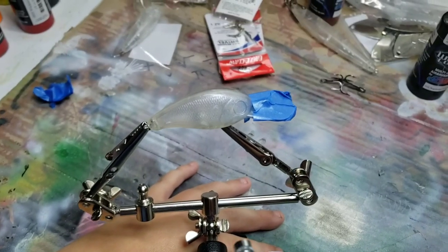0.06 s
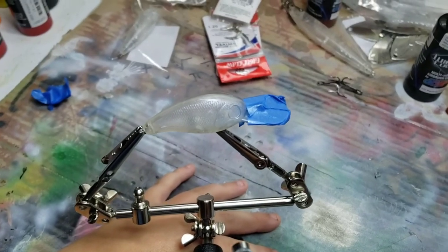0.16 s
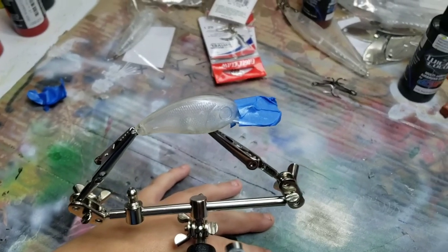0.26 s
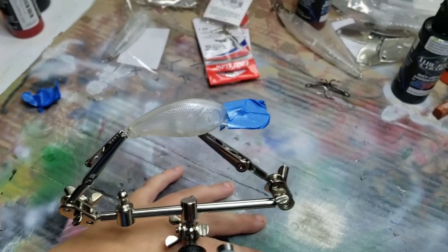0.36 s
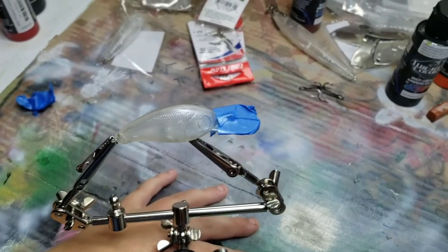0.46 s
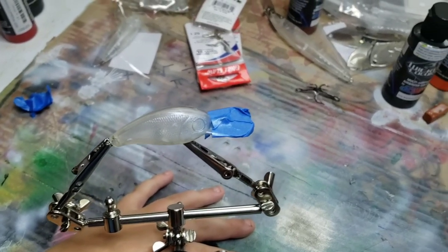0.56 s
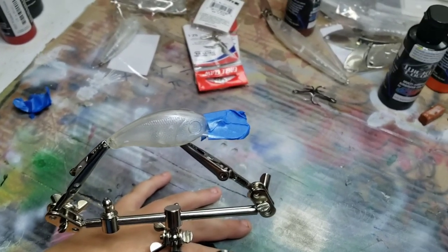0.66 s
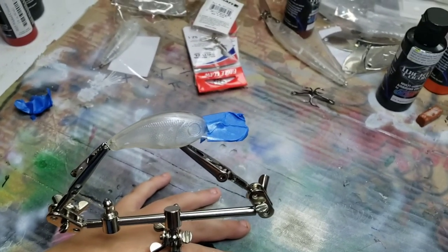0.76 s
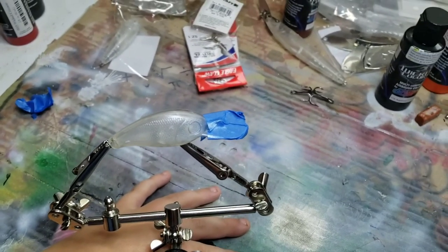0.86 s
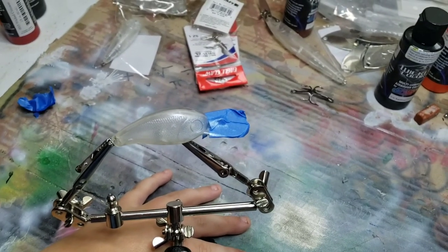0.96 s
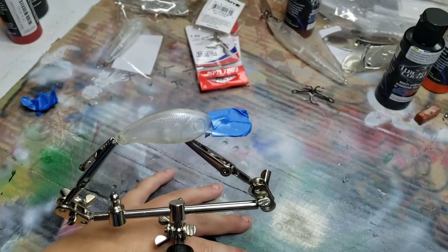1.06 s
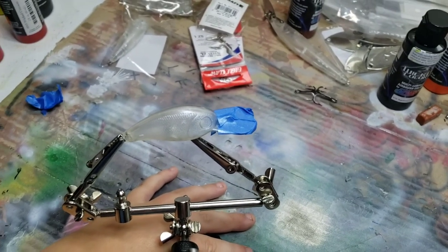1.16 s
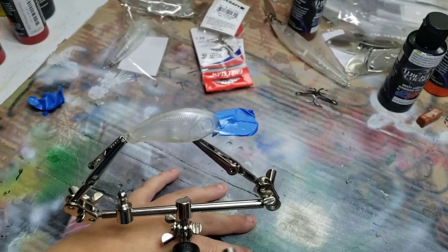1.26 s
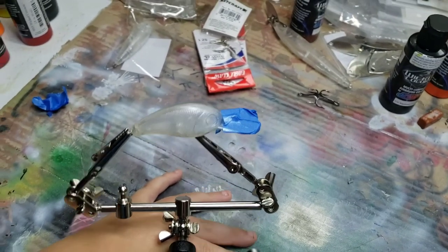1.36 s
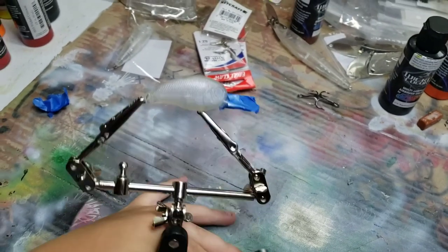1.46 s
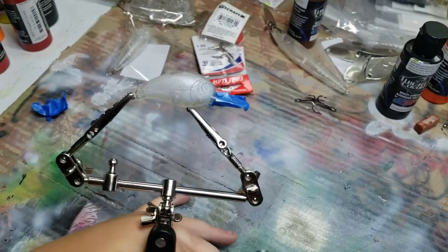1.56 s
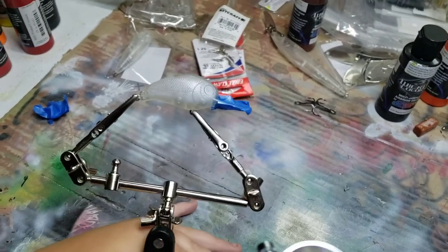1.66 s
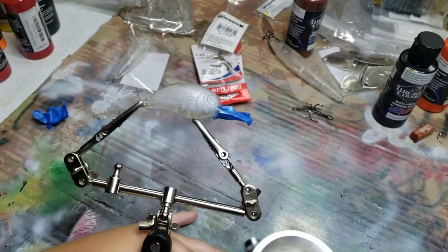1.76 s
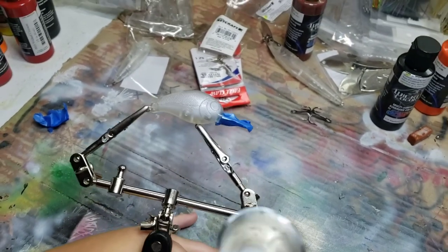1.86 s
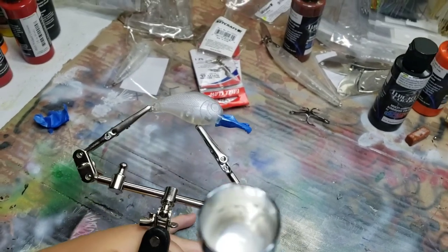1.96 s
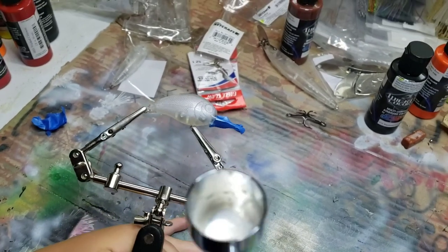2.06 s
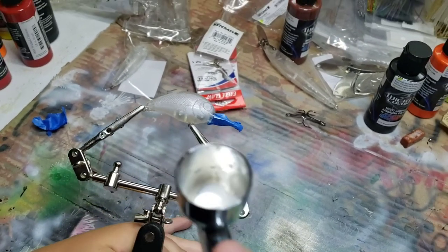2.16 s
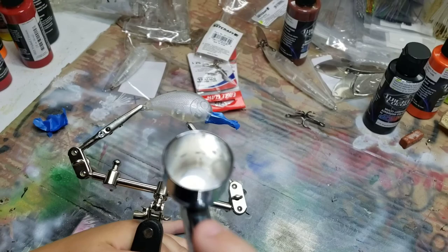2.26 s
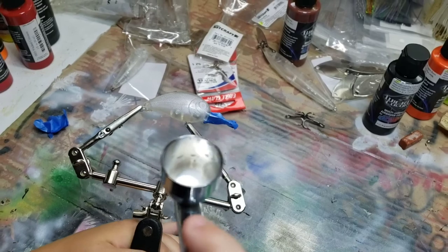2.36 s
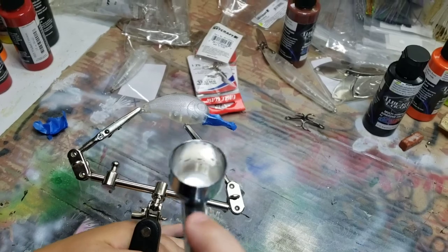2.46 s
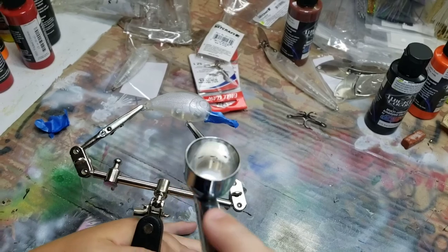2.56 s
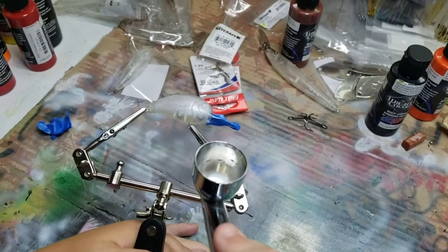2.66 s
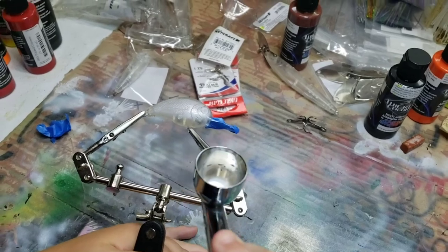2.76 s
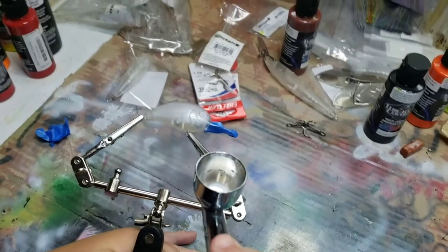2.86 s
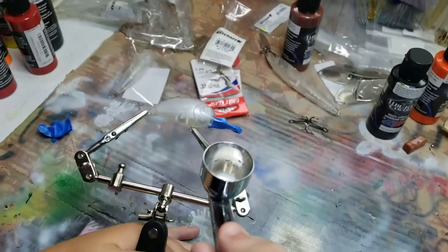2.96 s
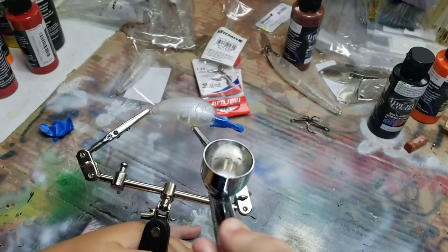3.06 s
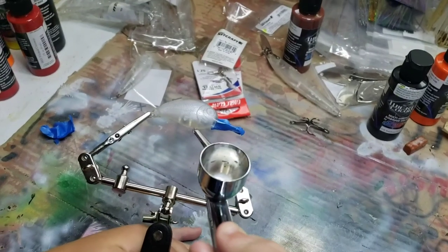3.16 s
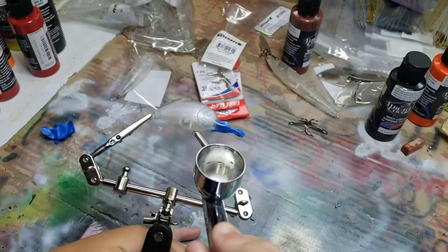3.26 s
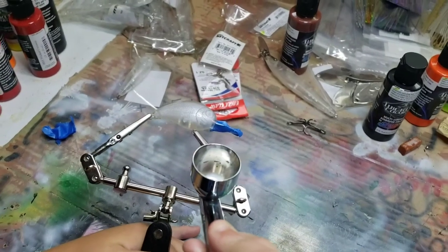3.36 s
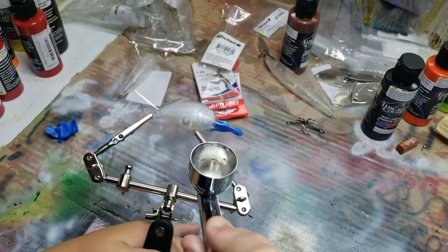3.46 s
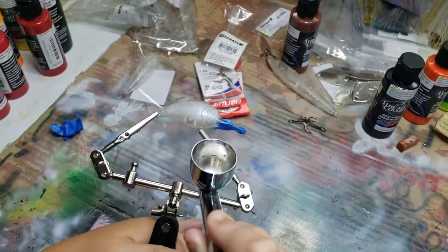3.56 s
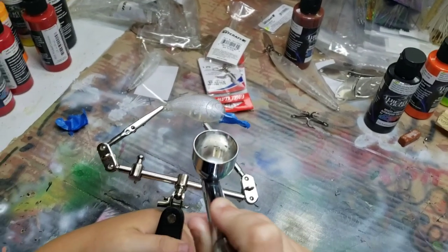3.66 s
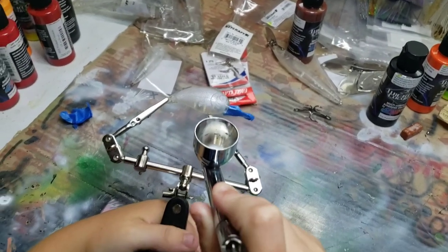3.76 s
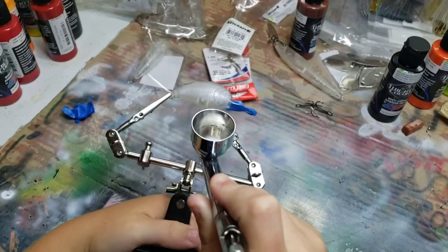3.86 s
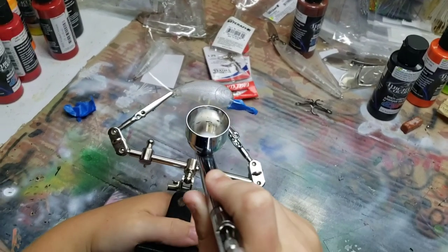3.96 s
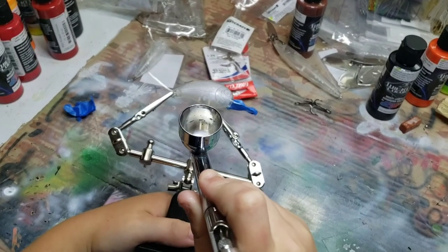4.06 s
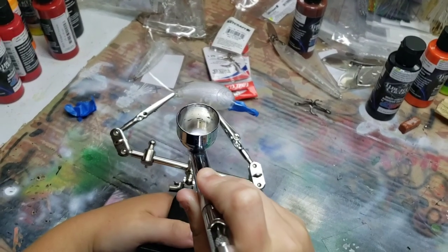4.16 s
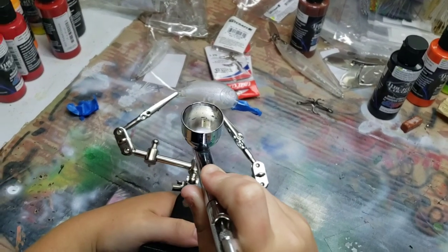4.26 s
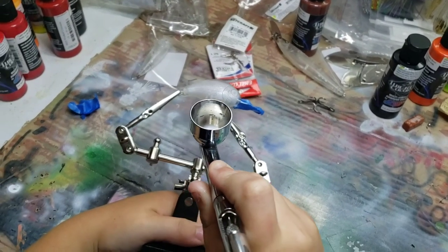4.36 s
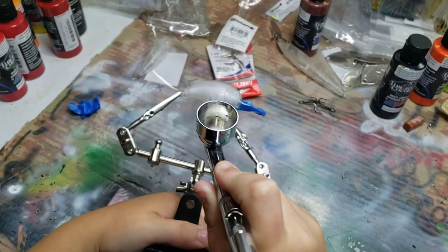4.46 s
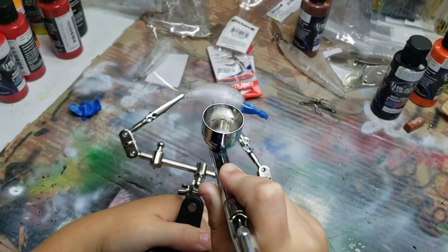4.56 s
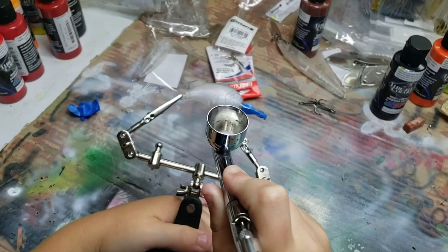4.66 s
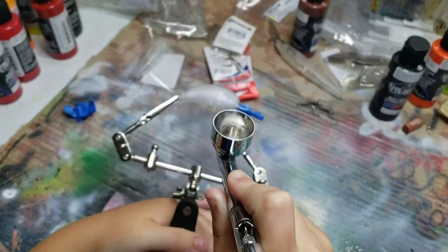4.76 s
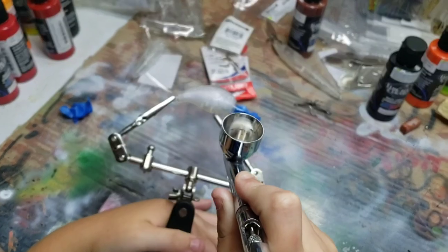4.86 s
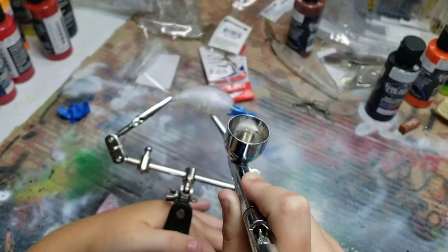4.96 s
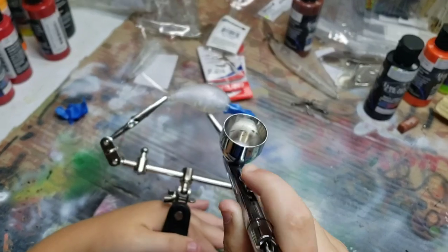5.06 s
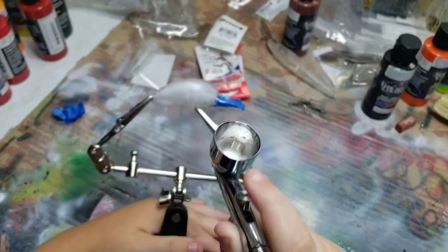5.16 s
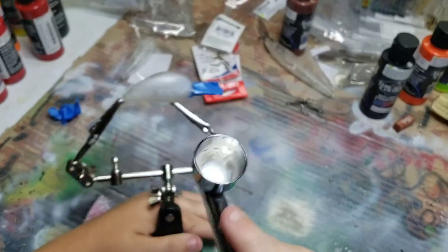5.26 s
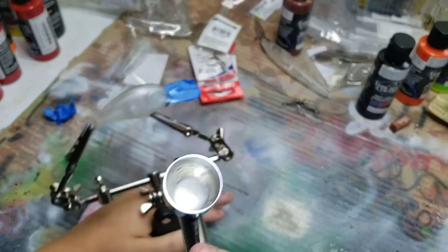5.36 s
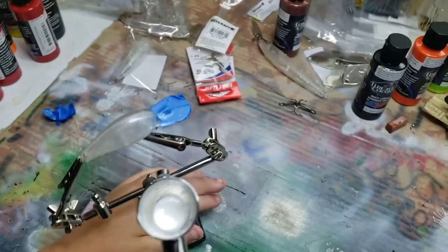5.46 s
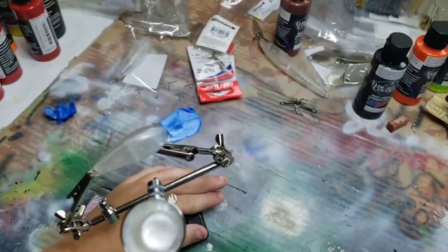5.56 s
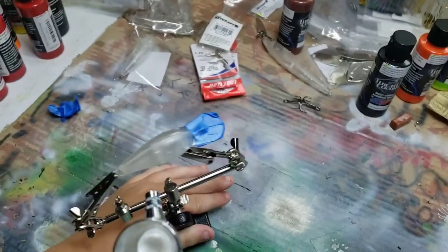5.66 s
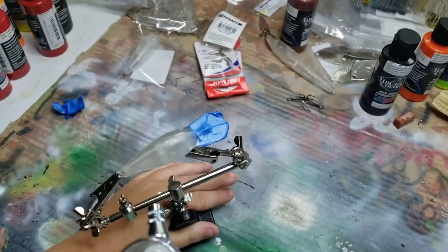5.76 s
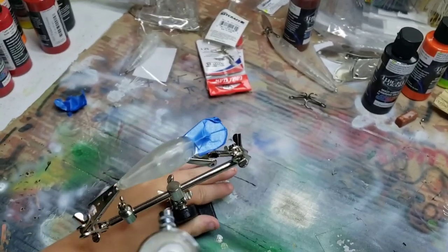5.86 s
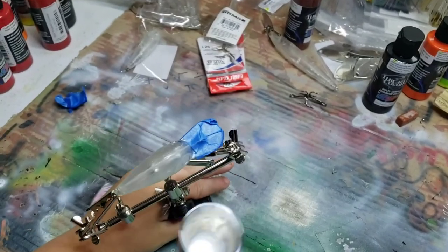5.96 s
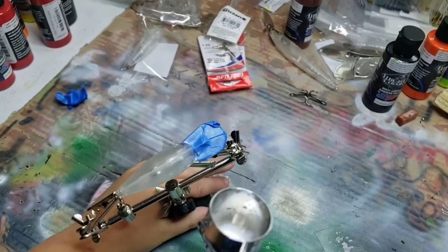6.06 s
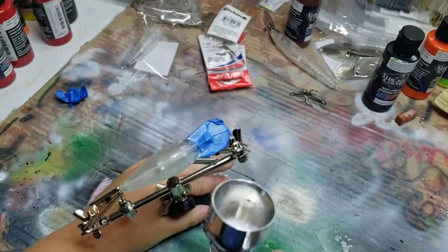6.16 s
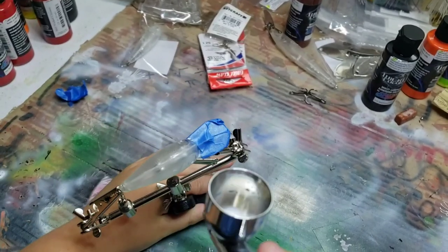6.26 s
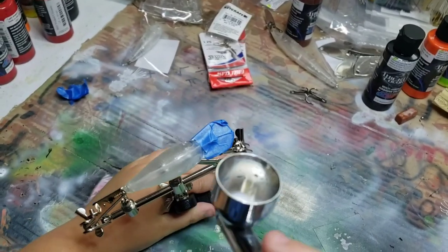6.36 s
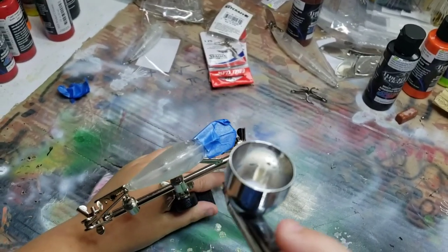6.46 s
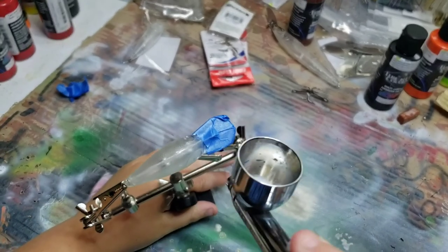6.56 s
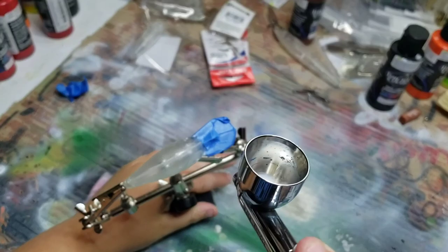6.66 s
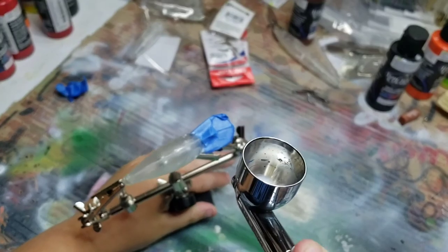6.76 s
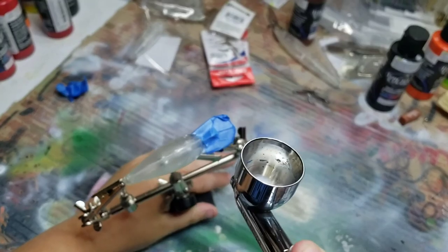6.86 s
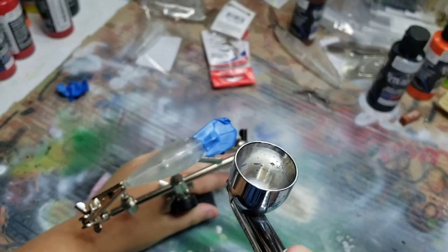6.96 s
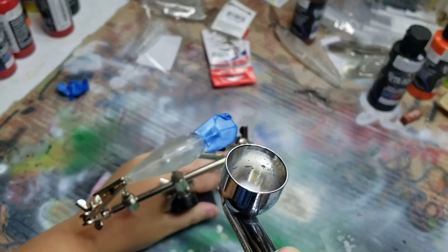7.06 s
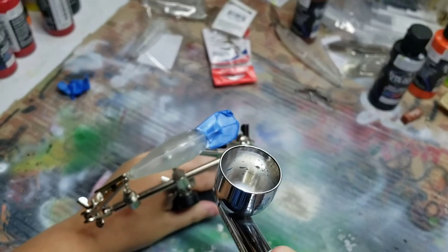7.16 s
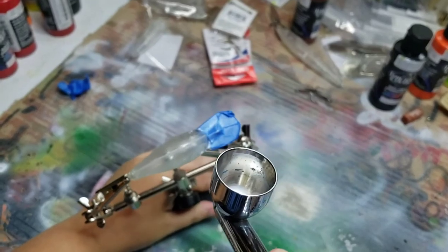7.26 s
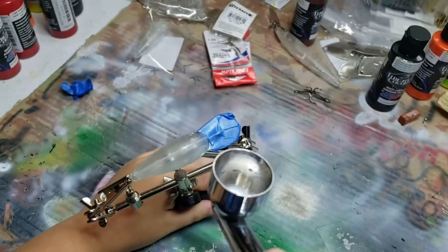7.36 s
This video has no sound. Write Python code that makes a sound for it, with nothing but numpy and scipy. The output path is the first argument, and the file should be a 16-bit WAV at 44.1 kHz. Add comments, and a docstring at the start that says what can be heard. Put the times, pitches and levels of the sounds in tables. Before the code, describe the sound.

Close, sharp airbrush hiss comes and goes above a buzzing little air pump, with trigger snaps, switch clicks and tiny metallic tinks in a quiet room.

```python
"""An airbrush is already hissing over a cluttered bench, close to a head-worn stereo microphone: three sprays of shaped
noise. A small piston compressor chugs below, about 28.5 strokes a second, each stroke striking a set of damped sines.
Its pressure switch clicks as it cuts out and back in. The trigger snaps, small metal parts tink, broad ticks come from
pump, switch, trigger and bench, the idle pump knocks, the trigger lets out one short puff, and a quiet room hums
behind in low noise."""
import sys
import numpy as np
from scipy import signal
from scipy.fft import rfft, irfft, next_fast_len
from scipy.io import wavfile
from scipy.ndimage import uniform_filter1d, map_coordinates

SR = 44100
rng = np.random.default_rng(int(sys.argv[2]) if len(sys.argv) > 2 else 0)


def convert_level_to_amplitude(level_db):
    """Map a level in decibels to its linear amplitude factor."""
    exponent = np.asarray(level_db, float) / 20
    return 10 ** exponent


def waveform_to_disk(signal):
    """Save audio, clipped to [-1, 1], as 16-bit WAV at the path in sys.argv[1]."""
    frames = np.transpose(np.atleast_2d(signal))
    scaled = np.clip(frames, -1, 1) * 32767
    samples = np.round(scaled).astype(np.int16)
    wavfile.write(sys.argv[1], SR, samples)


N = 326340  # samples
TIME = np.arange(N) / SR  # s
PAD, FRAME, LONGEST = 8192, 512, SR // 3  # samples: spare room, noise frame, longest single sound

# Noise colours, each: (frequency [Hz], relative level per Hz [dB])
NOZZLE_COLOUR = [(4120, -35), (7000, -20), (7480, -32), (8070, -3.5), (8730, -10.5), (11400, 0),
                 (12300, 4.5), (13400, 0.5), (15000, 7.5), (15600, 6.5), (16000, -7)]  # hiss at the nozzle
SPLASH_COLOUR = [(1470, -16), (2500, -5.5), (2720, -7), (3340, -8), (4160, -1.5), (5380, 1), (7460, 1),
                 (8090, -5.5), (9000, -10), (11700, -2.5), (19800, -120)]  # spray landing on the work
ROAR_COLOUR = [(35, -35.5), (60, -10), (102, -36), (138, -5.5), (280, -10.5), (500, -4.5), (838, -5),
               (928, -2.5), (1420, -9.5), (3500, -13), (4550, -29), (7700, -120)]  # low roar of the jet over the work
CASING_COLOUR = [(24, -25.5), (40, -5.5), (60, -2.5), (100, -7), (163, -6.5), (402, -39), (455, -4),
                 (680, -6), (965, 0.5), (1120, -11), (1340, -40.5), (1550, -5.5), (2980, -42),
                 (5870, -43.5), (10200, -28), (14800, -21.5), (16000, -23.5)]  # rattle of the running pump
INTAKE_COLOUR = [(1760, -60), (3000, -25), (3570, -15), (8400, -6.5), (10000, -13), (14200, 0.5),
                 (16000, -18.5)]  # puffing air intake
HISS_COLOUR = [(1470, -38), (2500, -9), (3130, -20.5), (3570, -7), (5740, -5), (7250, -15), (14900, -5),
               (16000, -3.5)]  # thin hiss around the pump
RUSTLE_COLOUR = [(350, -39.5), (600, -5), (874, -10), (1610, -4.5), (3500, -19.5), (4550, -46.5),
                 (7700, -120)]  # rustle around the pump
MURMUR_COLOUR = [(88, -59.5), (150, -29.5), (317, -14.5), (615, -19.5), (700, -29), (910, -60),
                 (1540, -120)]  # low murmur around the pump
HUM_COLOUR = [(15, -58.5), (25, -15.5), (64, 2.5), (108, -15), (135, -0.5), (172, -10.5), (250, -11),
              (320, -39), (550, -120)]  # room hum
PUFF_COLOUR = [(590, -55), (1000, -16), (1120, -3), (1220, -18), (2230, -7), (3230, -12), (3540, -5),
               (5830, -6.5), (8260, -16), (14900, -15), (16000, -15)]  # brief touch of the trigger

# Head shadow: (frequency [Hz], left minus right [dB])
HEAD_SHADOW = [(60, -0.5), (99, 0.0), (160, 0.5), (270, 0.5), (450, 2.5), (740, 3.0), (1220, 2.5),
               (2010, 1.5), (3330, -4.5), (5500, -10.0), (9080, -9.5), (15000, -4)]
# How alike the two sides of a noise are: (frequency [Hz], likeness [0-1])
LIKENESS = [(100, .95), (700, .975), (1500, .85), (4000, .85), (15000, .85)]
# How far reflections turn the phase between the ears: (frequency [Hz], rms turn [radians])
PHASE_DRIFT = [(300, .05), (1500, 1.1), (4000, 1.7)]
# The pump reaches the left ear first: (frequency [Hz], phase lead [radians])
PUMP_LEAD = [(200, .15), (700, .35), (1000, 1.2), (1600, 1.3), (2200, 1.2)]
# Decay of the room's answer: (frequency [Hz], t60 [s])
ROOM_DECAY = [(150, .35), (2000, 0.33), (8000, 0.22), (16000, 0.33)]
# Colour of the room's answer, the bass arriving mostly direct: (frequency [Hz], gain [dB])
ROOM_GAIN = [(100, -17), (400, -5), (1500, 8), (16000, 0)]

# Pulls of the trigger: (opens [s], shuts [s])
PULLS = [(-1, 1.31), (2.409, 5.09), (6.428, 7.5)]
# Air of each pull: (full hiss [dB], hiss at first below full [dB], splash against the hiss [dB])
PULL_AIR = [(-31.5, 8, -11.5), (-32, 7, -10.5), (-31, 5.5, -8)]
# Roar as the jet sweeps over the work: (time [s], level against the hiss [dB])
SWEEP = [(0, -20), (.5, -15.5), (.7, -11), (.9, -17), (1.3, -23), (2.42, -25), (2.6, -24.5), (3.7, -22.5),
         (4.3, -19.5), (5.08, -16.5), (6.44, -8.5), (6.9, -13), (7.15, -12), (7.4, -13.5)]

# Compressor runs: (first stroke [s], last stroke [s], count [strokes])
RUNS = [dict(first=-.0708, last=1.6805, count=51), dict(first=3.0123, last=5.5329, count=73),
        dict(first=7.0302, last=7.4152, count=12)]
# Strokes after the power is cut: (time [s], force against a driven stroke [dB])
COASTING = [(1.729, -7.5), (5.572, -6), (5.612, -15)]
# What a stroke rings: (frequency [Hz], t60 [s], moment in the turn [0-1], level in runs one, two, three [dB])
PUMP_MODES = [(60, 0.09, 0.21, -70, -61, -61), (85.5, 0.28, 0, -53, -53.5, -54),
              (123.8, 0.13, 0.19, -43.5, -44, -42.5), (168.4, 0.15, .25, -49, -48, -49),
              (245.4, 0.11, .3, -54, -55, -59), (453.5, 0.15, 0.03, -45.5, -48, -50),
              (505, 0.076, .24, -47, -42.5, -42.5), (598, 0.16, .6, -51.5, -46.5, -48),
              (694, .06, 0.5, -52, -56.5, -50), (792.5, 0.093, .01, -40, -46, -45),
              (870, 0.18, .45, -43.5, -60.5, -43.5), (954.7, 0.15, .43, -40, -39.5, -38.5),
              (976, .08, .727, -46.5, -42, -45), (1564, 0.065, 0.03, -49, -36.5, -37),
              (1628, 0.11, 0, -38, -44, -43), (1720, 0.046, 0.06, -43, -41, -39.5),
              (2000, 0.035, 0.01, -38, -41, -41.5), (2160, 0.026, 0.07, -40.5, -46, -49)]
# Motor hum at twice mains pitch, with side tones a stroke rate apart: (frequency [Hz], level [dB])
MOTOR_TONES = [(91.5, -61.5), (120, -60.5), (148.5, -65), (177, -64.5)]
# Hiss, rustle and murmur around the pump: (level while it runs [dB], level as it stops [dB], fast t60 [s],
# slower tail [dB], its t60 [s], floor [dB])
RUNDOWN = [(-57, -59, 0.76, -65.5, 2, -84.5), (-57, -52.5, 0.3, -70, 4.4, -75),
           (-58.5, -52, 0.64, -70.5, 2.6, -78.5)]
# Faint stirrings: (centre [s], half length [s], hiss [dB], rustle [dB], murmur [dB])
STIRS = [(1.997, 0.072, -62, -69, -73), (2.379, 0.053, -64, -65, -63), (2.75, 0.45, -66, -68, -58),
         (5.98, 0.069, -73, -73, -79), (6.19, 0.075, -81, -76, -74)]

# Trigger let go: (time [s], snap [dB], ring [dB])
SNAPS = [(1.353, -24, -62), (5.1405, -24.5, -54)]
# Pitched tinks of small parts: (time [s], level [dB], centre [Hz], spread [octaves])
TINKS = [(1.558, -45, 4200, .6), (5.7164, -56, 5760, .1), (6.1535, -58, 4950, .087),
         (6.153, -66, 6960, .15)]
# Pressure switch: (time [s], level [dB])
SWITCH = [(1.6853, -11), (2.8654, -22), (5.5371, -9.5)]
# Ringing of its contacts: (frequency [Hz], level within the click [dB], t60 [s])
CONTACT_MODES = [(5960, -17.5, 0.012), (8000, -16.5, 0.022), (8250, 7.3, 0.0047), (8400, -22.5, 0.013),
                 (11600, -19.5, 0.012), (14900, -22.5, .008)]
# Broad ticks, from the stopping pump, its switch, the trigger and the bench:
# (time [s], level [dB], centre [Hz], t60 [s])
TICKS = [(1.779, -39, 1800, 0.032), (1.862, -53, 600, .015), (1.9212, -51.5, 3000, .017),
         (1.977, -57, 2500, .02), (2.007, -40.5, 3980, 0.023), (2.096, -47, 6800, .025),
         (2.864, -35.5, 1800, .012), (5.6316, -41, 2000, .04), (5.909, -61, 12000, .018)]
# Pump settling: (time [s], level [dB], frequency [Hz])
KNOCKS = [(1.823, -45.5, 760), (1.934, -46.5, 765), (5.674, -47.5, 747), (5.803, -49, 767),
          (6.028, -51, 200)]
# Brief touch of the trigger: (time [s], level [dB], held [s], t60 [s])
PUFFS = [(2.096, -49, 0.03, 0.31)]
# Groan of the motor before it turns: (time [s], level [dB])
MOTOR_KICK = [(2.868, -36)]

STRIPES_DB = 2.0  # rms depth of the reflections' stripes from 1 kHz up
JET_LAG_S = 0.000221  # the jet reaches the left ear later


def unit(x):
    """Scale to rms 1."""
    return x / np.sqrt(np.mean(x ** 2) + 1e-20)


def along(points, hz):
    """Read (frequency, value) points on a log frequency axis."""
    f, v = np.transpose(points)
    return np.interp(np.log(hz + 1), np.log(f + 1), v)


def filtered(x, response):
    """Shape x by a complex response of frequency."""
    m = next_fast_len(N + PAD)
    return irfft(rfft(x, m) * response(np.fft.rfftfreq(m, 1 / SR)), m)[..., :N]


def ears(pair):
    """The head shades each side differently."""
    return filtered(pair, lambda hz: convert_level_to_amplitude(np.outer([.5, -.5], along(HEAD_SHADOW, hz))))


def patches(shape):
    """A random field of narrow bands that drift slowly."""
    across_bands = uniform_filter1d(rng.standard_normal(shape), size=3, axis=-2)
    return unit(uniform_filter1d(across_bands, size=50, axis=-1))


def rush(colour, stripes_db, lag_s=0):
    """Stereo noise; drifting reflections stripe each side and turn the phase between them."""
    hz, _, (a, b) = signal.stft(rng.standard_normal((2, N)), SR, nperseg=FRAME)
    share = np.clip(along(LIKENESS, hz), 0, 1)[:, None]
    turn = 2 * np.pi * hz[:, None] * lag_s + along(PHASE_DRIFT, hz)[:, None] * patches(a.shape)
    left = share * a * np.exp(-1j * turn) + np.sqrt(1 - share ** 2) * b
    pair = np.array([left, a])
    depth_db = stripes_db * np.clip(hz / 1000, .1, 1)[:, None]  # long waves pass the clutter
    striped = pair * convert_level_to_amplitude(depth_db * patches(pair.shape))
    noise = signal.istft(striped, nperseg=FRAME)[1][:, :N]
    return unit(filtered(noise, lambda f: convert_level_to_amplitude(along(colour, f))))


def fade(t60):
    """A decay of 60 dB in t60 seconds, held to at least 2 ms."""
    return np.exp(-np.log(1000) * TIME[:LONGEST] / max(t60, .002))


def ring(hz, t60, attack_s):
    """A struck resonance: a damped sine with a soft attack."""
    t = TIME[:LONGEST]
    return np.sin(2 * np.pi * hz * t) * fade(t60) * (1 - np.exp(-t / attack_s))


def burst(centre_hz, octaves, t60):
    """A dying burst of noise in a bell-shaped band."""
    hz = np.fft.rfftfreq(LONGEST, 1 / SR)
    band = np.exp(-(np.log2((hz + 1) / centre_hz) / octaves) ** 2)
    return unit(irfft(rfft(rng.standard_normal(LONGEST)) * band, LONGEST)) * fade(t60)


def add(track, s, sound):
    """Lay a sound on the track at time s."""
    part = track[round(s * SR):][:len(sound)]
    part += sound[:len(part)]


def struck(times, gains, sound):
    """Repeat a sound at each time, also from just before the start."""
    blows = np.zeros(N + 2 * PAD)
    blows[PAD + np.round(times * SR).astype(int)] = gains
    return signal.oaconvolve(blows, sound)[PAD:PAD + N]


def gate(spans, rise_s):
    """1 inside the spans, with ramps at the ends."""
    return sum(np.clip(np.minimum(TIME - a, b - TIME) / rise_s + .5, 0, 1) for a, b in spans)


def airbrush():
    """The jet hisses at the nozzle, splashes on the work and roars softly over the bench."""
    opens_s, shuts_s = np.transpose(PULLS)
    full_db, weak_db, splash_db = np.transpose(PULL_AIR)
    pull = np.searchsorted((shuts_s[:-1] + opens_s[1:]) / 2, TIME)
    since = np.maximum(TIME - opens_s[pull], 0)

    # an opening spurt, a wait, then a swell that overshoots and settles
    wait_s, swell_s, settle_s = .15, .52, 0.17
    swell = np.clip((since - wait_s) / swell_s, 0, 1)
    spurt_db = 2 * np.exp(-since / .07)
    crest_db = 0.5 * swell * np.exp(-np.maximum(since - wait_s - swell_s, 0) / settle_s)
    hiss_db = full_db[pull] - weak_db[pull] * (1 - swell) + spurt_db + crest_db
    flutter_db = .4 * map_coordinates(rng.standard_normal(200), [TIME * 20])  # 20 random points a second

    roar_db = np.interp(TIME, *np.transpose(SWEEP))
    splash_db = splash_db[pull] + 0.18 * (roar_db + 18)  # more splash where the roar is above -18 dB
    jet = rush(NOZZLE_COLOUR, STRIPES_DB, JET_LAG_S)
    jet = jet + convert_level_to_amplitude(splash_db) * rush(SPLASH_COLOUR, STRIPES_DB, JET_LAG_S)
    jet = jet + convert_level_to_amplitude(roar_db) * rush(ROAR_COLOUR, 0.75)
    return ears(jet) * convert_level_to_amplitude(hiss_db + flutter_db) * gate(PULLS, rise_s=0.0092)


def pump_strokes():
    """Stroke times, their runs and forces; the motor slows as the tank fills, so mid-run strokes come early."""
    lead_s = .0006
    strokes = [np.linspace(r["first"], r["last"], r["count"]) for r in RUNS]
    strokes = [s - lead_s * np.sin(np.linspace(0, np.pi, len(s))) for s in strokes]
    coasting_run = [0, 1, 1]
    run = np.concatenate([np.full(len(s), k) for k, s in enumerate(strokes)] + [coasting_run])
    coast_s, coast_db = np.transpose(COASTING)
    times = np.concatenate(strokes + [coast_s])
    force_db = np.concatenate([np.zeros(len(times) - len(coast_s)), coast_db])
    return times, run, force_db


def pump_body(times, run, force_db, turn_s, scatter):
    """Each turn the valve plate knocks, and body and tank ring in damped sines."""
    body = np.zeros(N)
    for (hz, t60, moment, *run_db), chance in zip(PUMP_MODES, scatter.T):
        blow_s = times + moment * turn_s + .00002 * chance
        blow_db = np.take(run_db, run) + force_db + 0.88 * chance
        body += struck(blow_s, convert_level_to_amplitude(blow_db), ring(hz, t60, attack_s=0.00073))
    return body


def check_valve(times, run, turn_s, chance):
    """The check valve ticks late in each turn, harder as the tank nears full pressure."""
    left_s = np.take([r["last"] for r in RUNS], run) - times
    tick_db = -47.0 - 9 * np.clip(left_s / 0.33, 0, 1) + 2.5 * chance
    return struck(times + .76 * turn_s, convert_level_to_amplitude(tick_db), ring(5800, 0.023, attack_s=0.0012))


def motor_hum(running):
    """Steady mains-driven tones that beat against the strokes."""
    return sum(convert_level_to_amplitude(db) * np.sin(2 * np.pi * hz * TIME) for hz, db in MOTOR_TONES) * running


def casing_rattle(running):
    """The casing rattles for as long as the pump runs."""
    return convert_level_to_amplitude(-48) * rush(CASING_COLOUR, 1.5) * running


def intake_puffs(times, force_db, chance):
    """The intake draws a soft swell of air noise on each stroke."""
    swells = struck(times, convert_level_to_amplitude(force_db + 2.2 * chance), np.hanning(round(.022 * SR)))
    return convert_level_to_amplitude(-51.5) * rush(INTAKE_COLOUR, 1.5) * swells


def compressor():
    """The piston pump: tonal body in mono, airy rattle in stereo, from the same strokes."""
    times, run, force_db = pump_strokes()
    turn_s = np.median(np.diff(times))
    scatter = rng.standard_normal((len(times), len(PUMP_MODES)))
    running = gate([(r["first"] - .05, r["last"] + 0.013) for r in RUNS], rise_s=0.12)
    body = pump_body(times, run, force_db, turn_s, scatter)
    body += check_valve(times, run, turn_s, scatter[:, 0]) + motor_hum(running)
    return body, casing_rattle(running) + intake_puffs(times, force_db, scatter[:, 1])


def room_hum():
    """A low, steady noise hum."""
    return convert_level_to_amplitude(-59) * rush(HUM_COLOUR, STRIPES_DB)


def pump_rundown():
    """Hiss, rustle and murmur die away at two speeds after the pump stops, and stir now and then."""
    coast_s = .03  # the pump shudders on this long before its noise dies away
    since_runs = []
    for r in RUNS:
        stopped = np.clip(TIME - r["last"] - coast_s, (TIME > r["last"]) / SR, None)
        since_runs.append(np.where(TIME > r["first"], stopped, np.inf))
    since = np.min(since_runs, axis=0)  # 0 while the pump runs

    faint = 0
    for k, colour in enumerate((HISS_COLOUR, RUSTLE_COLOUR, MURMUR_COLOUR)):
        running_db, fast_db, fast_t60, slow_db, slow_t60, floor_db = RUNDOWN[k]
        dying = convert_level_to_amplitude(fast_db - 60 * since / fast_t60) + convert_level_to_amplitude(slow_db - 60 * since / slow_t60) + convert_level_to_amplitude(floor_db)
        gain = np.where(since > 0, dying, convert_level_to_amplitude(running_db))
        for s, half_s, *stir_db in STIRS:
            gain = gain + convert_level_to_amplitude(stir_db[k]) * np.clip(1 - abs(TIME - s) / half_s, 0, 1)
        faint = faint + gain * rush(colour, STRIPES_DB)
    return ears(faint)


def trigger_snaps(track):
    """The released trigger snaps in a very broad burst, with a thin ring."""
    for s, db, ring_db in SNAPS:
        snap = burst(5700, 4.7, 0.013)
        add(track, s, convert_level_to_amplitude(db) * snap + convert_level_to_amplitude(ring_db) * ring(8700, .15, attack_s=.001))


def tinks(track):
    """Small metal parts tink: noise in a band narrow enough to have a pitch."""
    for s, db, centre_hz, octaves in TINKS:
        add(track, s, convert_level_to_amplitude(db) * burst(centre_hz, octaves, .033))


def pressure_switch(track):
    """The contacts spit a little noise and ring together."""
    for s, db in SWITCH:
        click = 0.045 * rng.standard_normal(LONGEST) * fade(.02)
        for hz, mode_db, t60 in CONTACT_MODES:
            click += convert_level_to_amplitude(mode_db) * ring(hz, t60, attack_s=0.001)
        add(track, s, convert_level_to_amplitude(db) * click)


def ticks(track):
    """Broad noise bursts: ticks from the stopping pump, its switch, the trigger and the bench."""
    for s, db, centre_hz, t60 in TICKS:
        add(track, s, convert_level_to_amplitude(db) * burst(centre_hz, 2.8, t60))


def settling_knocks(track):
    """The settling pump knocks: a damped tone with a shorter one above it."""
    t60 = 0.11
    for s, db, hz in KNOCKS:
        low = ring(hz, t60, attack_s=0.0015)
        high = 1.6 * ring(1.2 * hz, 0.27 * t60, attack_s=0.0013)
        add(track, s, convert_level_to_amplitude(db) * (low + high))


def puff():
    """Air escapes at once, holds, and dies away."""
    s, db, held_s, t60 = PUFFS[0]
    fall_db = -60 * np.clip(TIME - s - held_s, 0, 1) / t60
    return ears(rush(PUFF_COLOUR, STRIPES_DB, JET_LAG_S)) * convert_level_to_amplitude(db + fall_db) * (TIME > s)


def motor_groan(track):
    """The motor groans near mains pitch before it turns, cut off after 50 ms."""
    for s, db in MOTOR_KICK:
        groan = ring(62, .35, attack_s=0.0022) * (TIME[:LONGEST] < .05)
        add(track, s, convert_level_to_amplitude(db) * groan)


def clicks():
    """All the short sounds on one mono track."""
    track = np.zeros(N)
    for source in (trigger_snaps, tinks, pressure_switch, ticks, settling_knocks, motor_groan):
        source(track)
    return track


def room(pair):
    """The room answers with a noise tail in which each frequency dies at its own speed."""
    hz, t, z = signal.stft(rng.standard_normal((2, LONGEST)), SR, nperseg=FRAME // 2)
    decay = np.exp(-np.log(1000) * t / along(ROOM_DECAY, hz)[:, None])
    tail = signal.istft(z * decay, SR, nperseg=FRAME // 2)[1]
    tail = tail / np.linalg.norm(tail[0])
    tail = np.pad(tail, ((0, 0), (round(.003 * SR), 0)))  # the answer comes 3 ms late
    wet = signal.oaconvolve(pair, tail, axes=1)[:, :N]
    return filtered(wet, lambda f: convert_level_to_amplitude(along(ROOM_GAIN, f)))


def scene():
    """Mix all sources; jet, clicks and rattle get the room's answer, the rest stays dry."""
    jet = airbrush() + puff()
    body, rattle = compressor()
    body = filtered(body, lambda hz: np.exp(1j * np.outer([.5, -.5], along(PUMP_LEAD, hz))))
    rattle = ears(rattle)
    near = ears(np.array([clicks()] * 2))
    wet = room(convert_level_to_amplitude(-11.0) * near + convert_level_to_amplitude(-14) * jet + convert_level_to_amplitude(-10) * rattle)
    return near + jet + rattle + ears(body) + wet + room_hum() + pump_rundown()


def top_cut(x):
    """Nothing passes above the cut-off."""
    return signal.sosfilt(signal.butter(12, 17070, fs=SR, output="sos"), x)


def record(dry):
    """The microphone drops the deepest bass, and nothing is kept above the band limit."""
    top_hz, bass_hz = 15760, 38

    def band(hz):
        treble_cut = np.clip((top_hz - hz) / 80 + .5, 0, 1) ** 2
        return treble_cut / (1 + (bass_hz / (hz + 1)) ** 4)

    mix = filtered(dry, band)
    return top_cut(mix)


dry = scene()
out = record(dry)
waveform_to_disk(out)
```